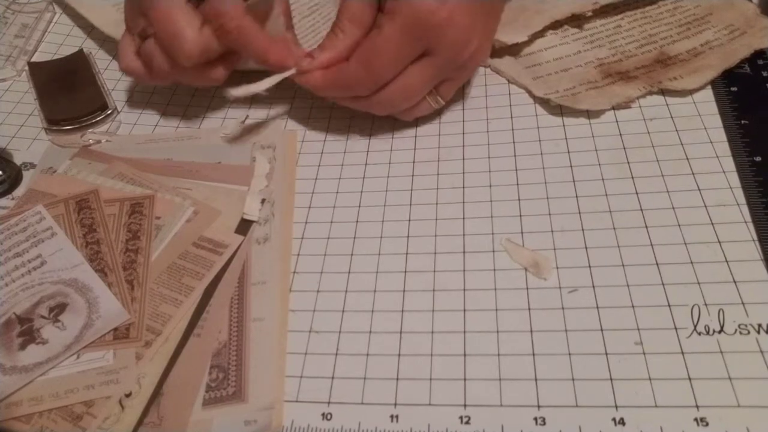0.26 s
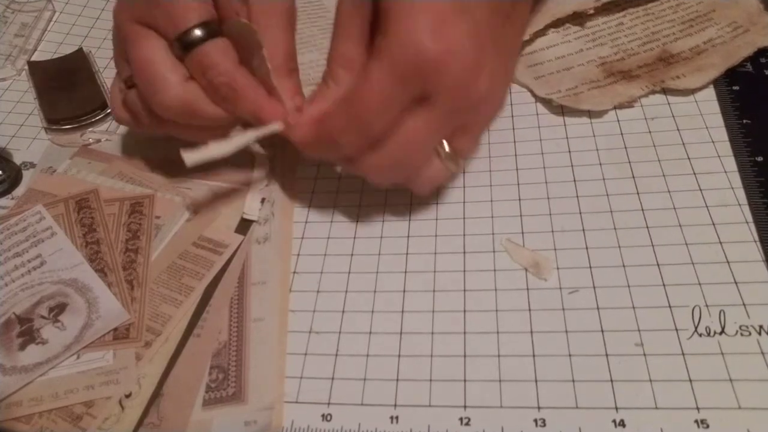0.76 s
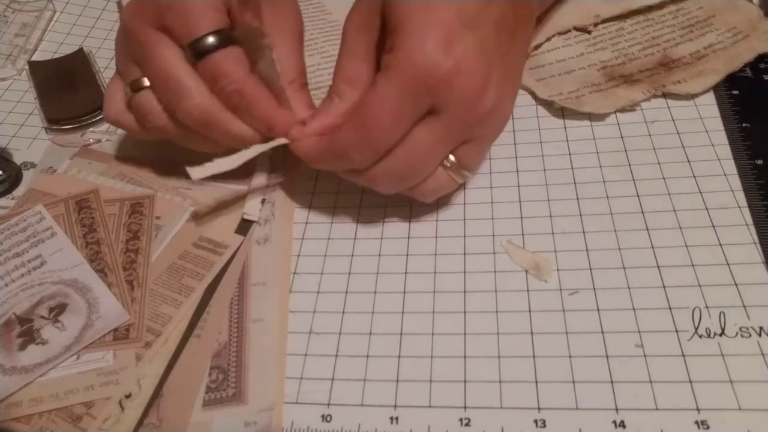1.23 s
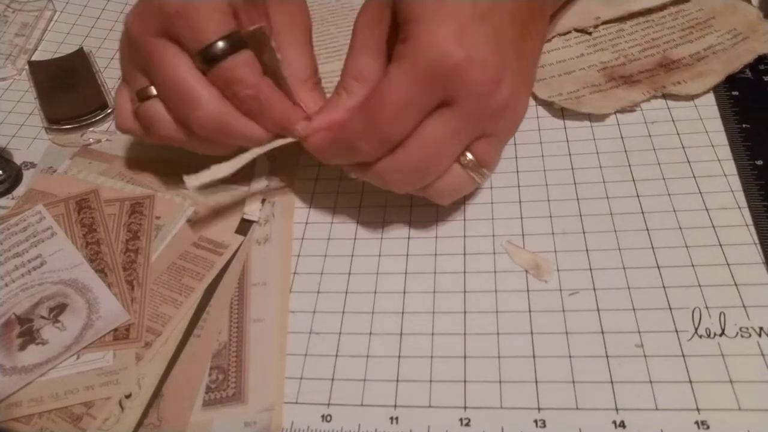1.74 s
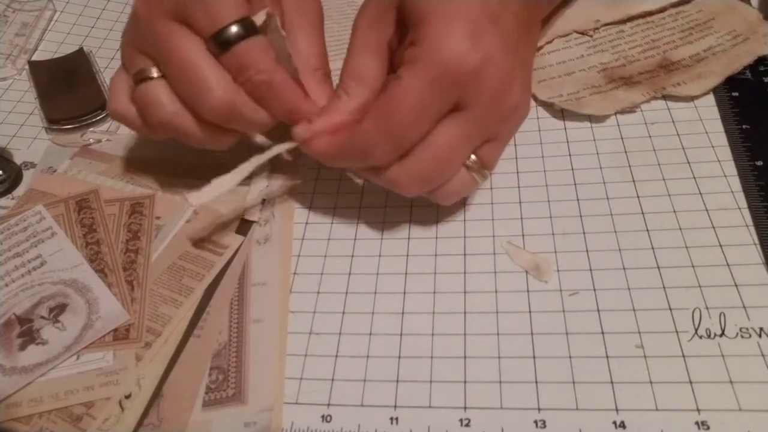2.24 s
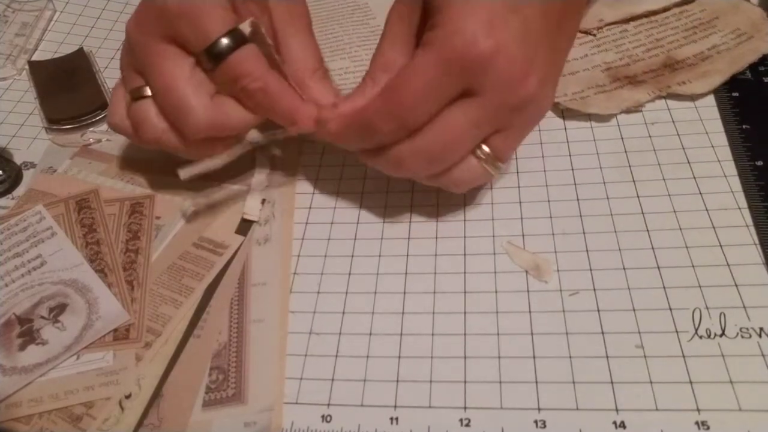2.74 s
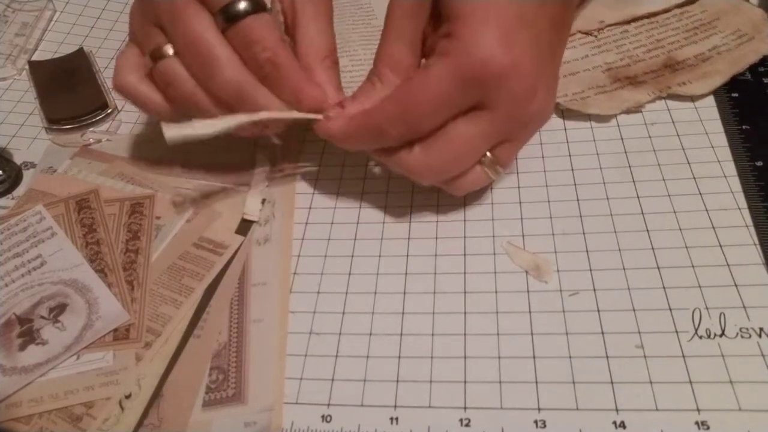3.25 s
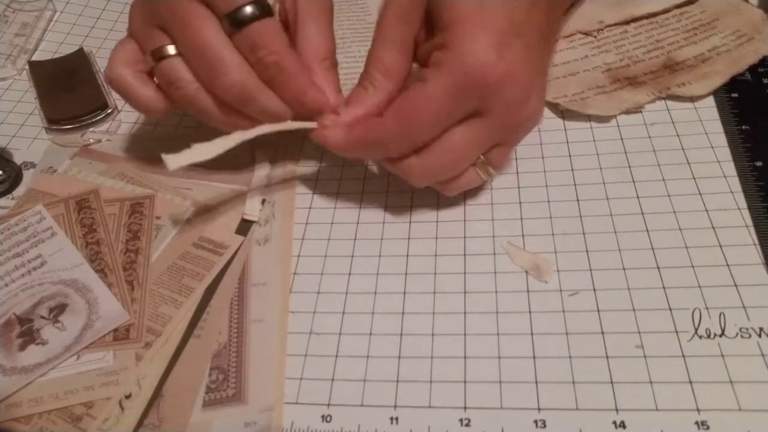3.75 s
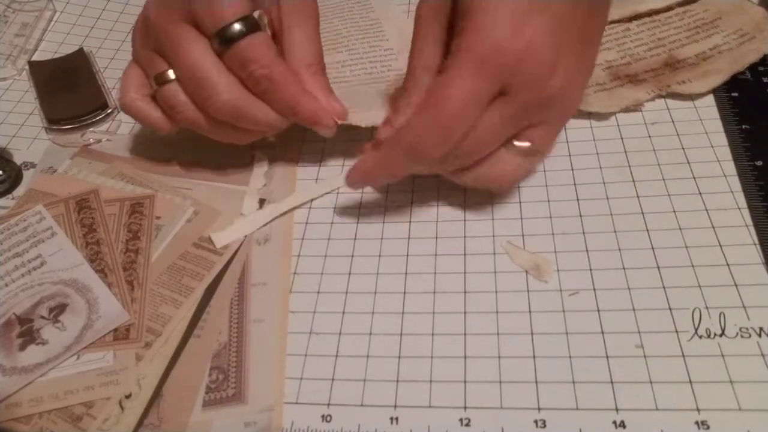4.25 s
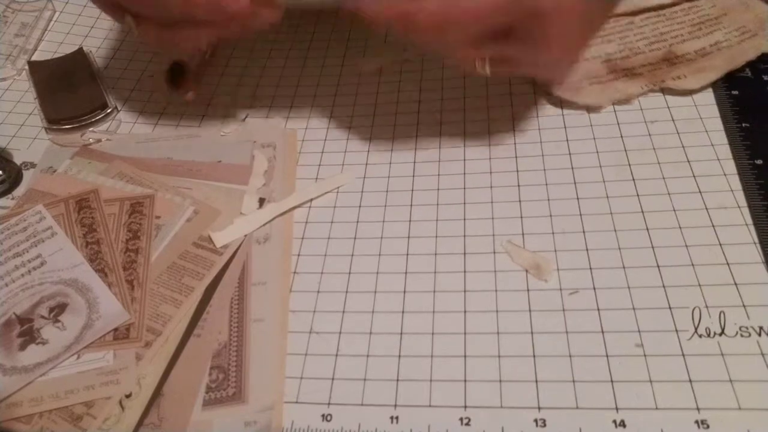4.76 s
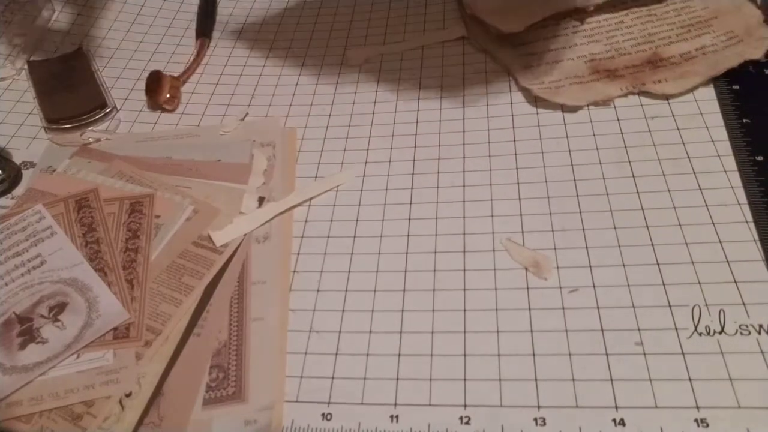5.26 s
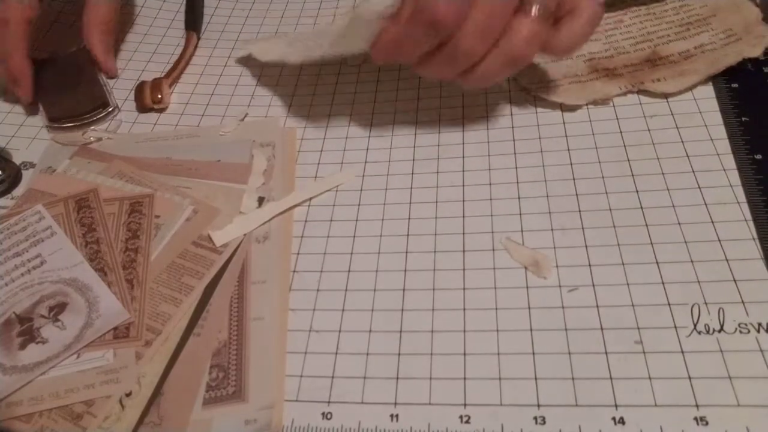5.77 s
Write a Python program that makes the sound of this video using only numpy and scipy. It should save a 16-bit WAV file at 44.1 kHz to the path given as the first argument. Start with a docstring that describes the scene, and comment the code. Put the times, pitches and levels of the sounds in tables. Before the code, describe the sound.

In a quiet room with low steady hum, paper is ripped by hand in brief, separate tugs, busiest in the first half second. Each tug is a grainy mid-pitched crackle with clicks and short rattles. Muffled low thumps of air buffet the close two-channel microphone, stronger at left. After the tearing, hollow little knocks cluster and thin dry rustling trails off.

```python
"""A quiet room hums throughout, made of half-octave bands of steady noise.
From the start, fingers tear a narrow strip off a sheet of paper in short pulls, close under a two-port
microphone: random fibre breaks ring the sheet's modes, creases snap as kicks with decaying rattles,
and the moving hands push low puffs of turbulent air at each port.
The fingers then turn the sheet: low knocks gather from about 4.7 s, drier rustle from about 5 s."""
import sys
import numpy as np
from scipy import signal
from scipy.io import wavfile
from scipy.ndimage import uniform_filter1d

SR = 44100
rng = np.random.default_rng(int(sys.argv[2]) if len(sys.argv) > 2 else 0)


def int16_out(signal):
    """Quantize to a 16-bit WAV file."""
    q = np.round(np.clip(np.atleast_2d(signal).T, -1, 1) * 32767)
    wavfile.write(sys.argv[1], SR, q.astype(np.int16))


N = 264600   # samples, 6 s

# upper modes of the small sheet: centre_hz, width_hz, level_db (relative)
SHEET_MODES = [(1530, 630, -2), (1787, 290, 6.5), (2004, 770, 0.5), (2800, 1330, -9.5)]
# broad resonances of the dry rasp: centre_hz, width_hz, level_db (relative)
RASP_MODES = [(3550, 1580, -3.5), (4980, 4020, -1), (6390, 4100, -3)]
# treble lift of the microphone: centre_hz, width_hz, level_db (relative)
TREBLE_MODES = [(9670, 3160, 7.5), (11220, 2380, 12.5), (15260, 5000, 5.5)]


def amp(db):
    """Level to amplitude: 20 dB is a factor of ten."""
    return 10 ** (np.asarray(db) / 20)


def rms_one(x):
    """Normalisation by mean power: scales each row to rms 1."""
    return x / np.sqrt(np.mean(x ** 2, axis=-1, keepdims=True) + 1e-20)


def at_hz(points, hz):
    """Interpolation on a logarithmic frequency axis."""
    points_hz, values = np.array(points).T
    return np.interp(np.log(hz), np.log(points_hz), values)


def drift(rate_hz):
    """Low-passed noise: white noise through a double real pole is a slow random drift of rms 1."""
    pole = np.exp(-2 * np.pi * rate_hz / SR)
    white = rng.standard_normal(N + SR)
    slow = signal.lfilter([1], [1, -2 * pole, pole * pole], white)
    return rms_one(slow[SR:])   # the first second lets the filter settle


def band(x, low_hz, high_hz):
    """Band limiting: keeps the skirts of a group of modes inside its own range."""
    return signal.sosfilt(signal.butter(2, [low_hz, high_hz], "band", fs=SR, output="sos"), x)


def resonate(x, modes, wander_db=None):
    """Modal superposition: parallel resonances, whose strengths may wander as the grip changes."""
    total = 0
    for k, (hz, width_hz, db) in enumerate(modes):
        r = np.exp(-np.pi * width_hz / SR)   # a wider resonance is damped faster
        numerator = [(1 - r * r) / 2, 0, (r * r - 1) / 2]
        denominator = [1, -2 * r * np.cos(2 * np.pi * hz / SR), r * r]
        rung = signal.lfilter(numerator, denominator, x)
        wander = wander_db * drift(5.06) if wander_db else 0
        sign = (-1) ** k
        total = total + sign * amp(db + wander) * rung
    return total


def panned(x, left_db):
    """Level difference between ports: left_db is left over right, with the gains' total power kept."""
    left = 1 / (1 + amp(-2 * left_db))
    shares = np.array([left, 1 - left]).reshape(2, -1)
    return x * np.sqrt(2 * shares)


def two_ports(x, alike):
    """Partial coherence: both ports hear row 0, the right one late, and each adds a row of its own."""
    right_lag = 4   # samples, the hands are nearer the left port
    alike = np.clip(alike, 0, 1)
    common = np.array([x[0], np.roll(x[0], right_lag)])
    return np.sqrt(alike) * common + np.sqrt(1 - alike) * x[1:]


def swells(rows, rise_s, resting_db):
    """Addition of powers: gains per layer from rows (start, hold, fall, levels) over a resting level."""
    t = np.arange(0, N + 32, 32) / SR   # one point every 32 samples
    power = amp(resting_db)[:, None] ** 2 + 0 * t
    for start_s, hold_s, fall_s, *levels_db in rows:
        before = np.maximum((start_s - t) / rise_s, 0)
        after = np.maximum((t - start_s - hold_s) / max(fall_s, .01), 0)
        drop_db = 20 * (before + after)   # rise_s and fall_s are the times for 20 dB
        power = power + amp(np.array(levels_db)[:, None] - drop_db) ** 2
    return np.array([np.interp(np.arange(N) / SR, t, row) for row in np.sqrt(power)])


def room():
    """Band-filtered stationary noise of room and microphone, with coherence set by mid and side powers."""
    # noise spectrum: centre_hz, density_db (per Hz, relative)
    spectrum = [(35, -52), (60, 1), (227, -2), (590, -37), (762, -26), (1400, -36.5), (1680, -32),
                (3240, -39), (6990, -43), (8620, -58), (10100, -57), (12200, -38), (15800, -27)]
    # left-right likeness: centre_hz, likeness (0 to 1)
    likeness = [(60, 0.29), (250, 1), (700, 0.28), (2000, 0.075), (5000, 0.023)]
    total, edges_hz = 0, 45 * 2 ** np.arange(0, 9, .5)
    white = rng.standard_normal((2, 2, N))
    for k, (low_hz, high_hz) in enumerate(zip(edges_hz, edges_hz[1:])):
        mid, side = band(white[k % 2], low_hz, high_hz)   # neighbouring bands use different noise
        centre_hz = np.sqrt(low_hz * high_hz)
        alike = np.clip(at_hz(likeness, centre_hz), 0, 1)
        ports = np.sqrt(1 + alike) * mid + np.sqrt(1 - alike) * side * [[1], [-1]]
        total = total + amp(at_hz(spectrum, centre_hz)) * ports
    return panned(amp(-58.5) * rms_one(total), 5.0)


def puffs():
    """Turbulent pressure: independent low noise at each port, its loudness evened out within a puff."""
    # air puffs from the moving hands: start_s (full strength), hold_s, level_db (mean power of the ports),
    # left_over_right_db
    puff_rows = [(0.0, 0.0024, -29.5, 14), (0.15, 0.062, -36, 19), (0.287, 0.0031, -32.5, 30),
                 (0.372, 0.0076, -42, 32), (0.44, 0.11, -51, 19), (0.761, 0.038, -40, 25),
                 (0.846, 0.043, -49.5, 29), (0.953, 0.0032, -38, 34), (1.039, 0.065, -42.5, 36),
                 (1.199, 0.0044, -44.5, -14), (1.3, 0.0076, -26, 18), (1.341, 0.063, -35, 5.5),
                 (1.477, 0.047, -49.5, -19), (1.639, 0.041, -28, 31), (1.789, 0.021, -39.5, -4),
                 (1.846, 0.063, -35.5, -3), (1.95, 0.082, -40, 3.5), (2.082, 0.0045, -32, 11),
                 (2.128, 0.0084, -29, 19), (2.182, 0.093, -44.5, 24), (2.397, 0.0057, -48.5, 30),
                 (2.48, 0.008, -43.5, 28), (2.734, 0.0062, -45, 27), (2.857, 0.005, -45.5, 32.5),
                 (2.97, 0.0026, -29, 30), (3.052, 0.005, -43, 3), (3.124, 0.044, -35.5, 27),
                 (3.254, 0.0017, -38.5, 15), (3.325, 0.0074, -40, 29), (3.517, 0.078, -47.5, 26),
                 (3.845, 0.0085, -44, 33), (4.053, 0.0062, -37.5, 40), (4.174, 0.085, -41, 45),
                 (4.371, 0.062, -39, 23.5), (4.484, 0.044, -43.5, 11), (4.608, 0.077, -34, 18),
                 (4.71, 0.018, -38.5, 4), (4.796, 0.048, -36, -1), (4.898, 0.013, -42, -0.5),
                 (5.003, 0.0032, -31.5, 18), (5.067, 0.005, -39, 11.5), (5.1, 0.0042, -34.5, -4),
                 (5.232, 0.024, -33, 19), (5.329, 0.02, -43, 8), (5.718, 0.0037, -45, 15),
                 (5.899, 0.0069, -49.5, 16)]
    # colour of the air noise: centre_hz, width_hz, level_db (relative)
    air_modes = [(37.8, 19.6, -5.5), (59.7, 24.9, 0.5), (99.3, 37.5, -4), (122.9, 76.6, -11)]
    # level between puffs: left_db, right_db
    still_air_db = [-55.5, -69.5]
    rise_s, fall_s = 0.038, 0.048   # times to climb and drop 20 dB
    rows = []
    for start_s, hold_s, db, left_db in puff_rows:
        port_powers = 2 / (1 + amp([-2 * left_db, 2 * left_db]))
        rows.append((start_s, hold_s, fall_s, *(db + 10 * np.log10(port_powers))))
    air = resonate(rng.standard_normal((2, N)), air_modes)
    air = band(air, 30.0, 170.0)
    local_rms = np.sqrt(uniform_filter1d(air ** 2, size=1800, axis=1) + 1e-12)
    evened = rms_one(air / local_rms ** 0.37)
    return swells(rows, rise_s, still_air_db) * evened


def faint_snaps(count):
    """Random point events: small snaps at uniformly drawn moments, each with its own colour."""
    mean_db = [-64.5, -64.5, -89, -67.5]   # body, knock, rasp, treble, before the layer gains
    spread_db, rattle_ms = 4.0, 5.1
    events = []
    for _ in range(count):
        start_s = N / SR * rng.random()
        levels_db = mean_db + spread_db * rng.standard_normal(len(mean_db))
        events.append((start_s, *levels_db, rattle_ms))
    return events


def snaps():
    """Impulse excitation: a snapping crease is a sharp kick and a dying rattle that ring all the modes."""
    # creases snapping: start_s, body_db, knock_db, rasp_db, treble_db (all before the layer gains below),
    # rattle_ms (amplitude decay constant before the decay factors)
    snap_rows = [(0.027, -40.5, -58, -63, -53, 9.5), (0.039, -37.5, -52.5, -49, -49, 10.7),
                 (0.083, -37.5, -53.5, -54, -53, 6.2), (0.165, -35.5, -58, -51.5, -44, 8.5),
                 (0.2674, -25, -40.5, -32.5, -38, 3), (0.2775, -42, -58, -47, -55, 2.6),
                 (0.488, -36.5, -37, -50, -42.5, 4.4), (0.736, -64, -61, -61, -52.5, 3),
                 (0.7816, -47.5, -61, -74, -49, 3.2), (0.8764, -46.5, -68, -79, -55, 2.6),
                 (0.907, -59, -61, -80, -58, 3.2), (0.966, -57, -82, -82, -60, 2.7),
                 (1.1428, -58, -69, -79, -76, 4), (1.267, -33, -64, -64, -43.5, 5.7),
                 (1.287, -40, -64, -70, -55, 3), (1.3196, -37.5, -49, -71, -65, 3.5),
                 (1.327, -40, -57, -70.5, -60, 2.5), (1.483, -55, -61, -62, -59, 4.1),
                 (1.6244, -36, -50, -53, -62, 2.4), (1.815, -61, -66, -69, -48.5, 3.9),
                 (1.8535, -52, -59, -73.5, -48, 3.9), (1.9053, -44, -75, -78, -48, 1.5),
                 (2.1048, -42, -42.5, -78, -71, 3.4), (2.1174, -58, -45.5, -78, -68, 3.7),
                 (2.1359, -45, -45, -72, -65, 3), (2.185, -49, -69, -70, -54, 3.3),
                 (2.3994, -72, -80, -85, -55, 3), (2.5934, -67, -77, -66, -49, 2.1),
                 (2.6943, -62.5, -40.5, -66.5, -71, 3.1), (2.7447, -52, -54, -80, -59, 4.2),
                 (3.0074, -35, -41, -59, -76, 2.5), (3.1648, -48, -62, -69, -45.5, 1.7),
                 (3.2151, -44, -67, -69, -49.5, 2.8), (3.3779, -44.5, -63, -72, -58, 3.1),
                 (3.5914, -43.5, -79, -66, -51, 8.6), (3.6262, -35, -51.5, -58.5, -50.5, 10),
                 (3.6726, -41, -55, -74, -71, 10), (3.7798, -68, -60, -95, -76, 4.6),
                 (4.408, -40, -54, -70, -64, 4.5), (4.4415, -37.5, -47, -71, -65, 2.4),
                 (4.7366, -41, -42, -56, -52, 12), (4.7572, -39.5, -41.5, -46.5, -48, 5.6),
                 (4.812, -36, -32, -48, -69, 3.2), (4.8252, -43, -41.5, -63, -68, 6.1),
                 (4.8434, -41, -40, -57, -70, 1.7), (4.8534, -45, -36.5, -59, -53, 7.7),
                 (4.9258, -48, -44.5, -73, -70, 6.7), (4.9838, -36, -32.5, -57, -47.5, 3.1),
                 (4.9955, -45, -44, -56, -65, 5.8), (5.0937, -33.5, -43.5, -69, -67, 3.6),
                 (5.1074, -54, -48.5, -47, -47, 4.1), (5.2205, -65, -53, -81, -73, 2.5),
                 (5.2504, -69, -70, -57, -54, 3.6), (5.3066, -48, -51, -69, -63, 7.1),
                 (5.325, -55, -50, -64, -52, 12), (5.5043, -70, -59, -72, -72, 3.9),
                 (5.5979, -46.5, -57, -50.5, -81, 3.7), (5.7073, -45, -56, -70, -66, 2.2)]
    # rattle decay factors: body, knock, rasp, treble (ratios)
    decay_factors = [1.03, 2.3, 1.2, 0.96]
    # height of the first kick relative to the snap's level: body, knock, rasp, treble (ratios)
    kick_heights = [1.52, 4.72, 3.9, 1.23]
    # sheet flexing as a whole: centre_hz, width_hz, level_db (relative)
    knock_modes = [(260, 210, -0.5), (499, 60, 4), (830, 355, -2.5)]
    length = 2600   # samples of rattle
    events = snap_rows + faint_snaps(count=18)
    rattles = rng.standard_normal((len(events), 3, length))
    kicks = np.zeros((4, 3, N + length))   # layer, path, time
    elapsed_ms = np.arange(length) / SR * 1000
    for (start_s, *levels_db, rattle_ms), rattle in zip(events, rattles):
        decay_ms = np.maximum(rattle_ms * np.array(decay_factors), .3)[:, None, None]
        shape = .3 * rattle * np.exp(-elapsed_ms / decay_ms)
        i = round(start_s * SR)
        kicks[:, :, i:i + length] += amp(levels_db)[:, None, None] * shape
        kicks[:, :, i] = -(amp(levels_db) * kick_heights)[:, None]   # same kick on all paths
    kicks = kicks[:, :, :N] + 1e-18   # keeps the filters off vanishingly small numbers

    body = band(resonate(kicks[0], SHEET_MODES), 530.0, 2130.0)
    body = amp(16.5) * two_ports(body, alike=0.97)
    push = amp(-18.0) * band(kicks[1], 150.0, 790.0)   # the pressure pulse itself, before the modes take over
    flexing = band(resonate(kicks[1], knock_modes), 160.0, 1470.0)
    knock = amp(18.0) * two_ports(push + flexing, alike=0.84)
    rasp = band(resonate(kicks[2], RASP_MODES), 2550.0, 5400.0)
    rasp = amp(20.0) * two_ports(rasp, alike=0.55)
    treble = band(resonate(kicks[3], TREBLE_MODES), 5200.0, 20000.0)
    treble = amp(5.5) * two_ports(treble, alike=0.1)
    return panned(body, 6.5) + panned(knock, 2.6) + panned(rasp, 2.0) + treble


def fibres(per_s, spread_db, clump_db):
    """Random impulse train: breaks come in clumps, a few much louder than the rest, over a fine rub."""
    clumps = amp(clump_db * drift(44.0))
    broken = rng.random(N) < per_s / SR
    sizes = amp(spread_db * np.minimum(rng.exponential(1, N), 3.5))
    breaks = broken * sizes * rng.standard_normal((3, N))
    rub = 0.46 * rng.standard_normal((3, N))
    return clumps * (breaks + rub)


def tearing():
    """Source and resonator: fibre crackle and sparser buckling of the sheet drive its modes pull by pull."""
    # pulls and rubs of the paper: start_s (full strength), hold_s, fall_s (for 20 dB, 0.01 at least),
    # body_db, belly_over_body_db (low modes), rasp_over_body_db, hiss_over_body_db
    pulls = [(0.0, 0.044, 0.21, -58.5, -8, -8, -7), (0.166, 0.0041, 0.15, -56.5, -3.5, -6.5, -3.5),
             (0.28, 0.0056, 0.08, -54, -6.5, -2, -4), (0.398, 0.082, -0.25, -78, 0, 9, 8.5),
             (0.473, 0.075, 0.13, -58, -5.5, -4, -3.5), (0.665, 0.004, 0.08, -61.5, 0.5, -7, -3),
             (0.722, 0.19, 0.1, -68, -0.5, -10, 0), (1.093, 0.0045, 0.18, -63, -3.5, -14, -2.5),
             (1.168, 0.0067, -0.15, -58.5, 2.5, -17, -10), (1.272, 0.037, 0.15, -57, 0, -9.5, -1.5),
             (1.478, 0.005, 0.16, -66, 1, -3, 3.5), (1.624, 0.0077, 0.04, -48, -2, -8.5, -4.5),
             (1.673, 0.005, 0.32, -64, -1.5, -5.5, -4.5), (1.815, 0.034, 0.22, -57.5, -10.5, -9, -2),
             (2.04, 0.009, 0.04, -58, -6.5, -11, 1), (2.101, 0.15, 0.17, -63, -7.5, -12, -4),
             (2.41, 0.04, 0.3, -81, -3, -14, 10.5), (2.526, 0.019, 0.09, -68.5, 0, -1.5, 3),
             (2.671, 0.011, 0.55, -67.5, -3, -24, -5.5), (2.753, 0.0038, 0.14, -60.5, 1.5, -12.5, -8),
             (3.017, 0.019, 0.16, -63.5, 6.5, -12, -10), (3.169, 0.09, -0.21, -62, -11, -16, -2.5),
             (3.389, 0.005, 0.0646, -52, -6, -13.5, -8), (3.465, 0.005, 0.18, -64.5, -8, -11, -1),
             (3.634, 0.0036, 0.1, -55.5, -2.5, -12.5, -8), (3.792, 0.026, 0.28, -61.5, -3, -12, -9),
             (4.013, 0.048, 2, -73.5, -7, -12.5, -8), (4.221, 0.005, 0.3, -63.5, -13, -4, -1),
             (4.42, 0.17, 0.23, -60.5, -8, 0, 1), (4.569, 0.013, 0.07, -54.5, -19, -4, 2),
             (4.732, 0.14, 0.24, -63, -0.5, 0, -0.5), (4.917, 0.087, 0.28, -65.5, 4, -1.5, 0),
             (5.04, 0.011, 0.16, -60.5, -12, 4, 3.5), (5.098, 0.039, 0.24, -68, -1.5, 5.5, 11),
             (5.25, 0.019, 0.38, -74, -6, 8, 9), (5.297, 0.07, 0.12, -66, -7, 4.5, 7.5),
             (5.593, 0.005, 0.4, -65.5, -5.5, -3, -5), (5.729, 0.0045, 0.16, -65, -8, 3.5, 6.5),
             (5.871, 0.14, 0.1, -66.5, -12.5, -3.5, -2)]
    # low modes of the held sheet: centre_hz, width_hz, level_db (relative)
    belly_modes = [(807, 300, 4), (1128, 145, 7), (463, 63, -2), (380, 91, 4.5)]
    # faint creak of the held sheet between pulls: body_db, belly_db, rasp_db, hiss_db
    held_db = [-119, -91.5, -84, -80]
    rows = []
    for start_s, hold_s, fall_s, body_db, *over_db in pulls:
        rows.append((start_s, hold_s, fall_s, body_db, *(body_db + np.array(over_db))))
    body_gain, belly_gain, rasp_gain, hiss_gain = swells(rows, 0.038, held_db)

    crackle = fibres(per_s=2500, spread_db=2.5, clump_db=1.5)
    buckling = fibres(per_s=500, spread_db=6.0, clump_db=2.5)
    body = band(resonate(crackle + 0.48 * buckling, SHEET_MODES, wander_db=1.5), 830.0, 2760.0)
    belly = band(resonate(buckling, belly_modes, wander_db=3.5), 270.0, 1500.0)
    rasp = band(resonate(crackle, RASP_MODES, wander_db=1.6), 2700.0, 7500.0)
    hiss = band(resonate(crackle[[1, 2, 0]], TREBLE_MODES, wander_db=1.2), 8000.0, 19000.0)

    body = body_gain * two_ports(rms_one(body), alike=0.7)
    belly = belly_gain * two_ports(rms_one(belly), alike=0.61)
    rasp = rasp_gain * two_ports(rms_one(rasp), alike=0.14)
    hiss = hiss_gain * two_ports(rms_one(hiss), alike=0.032)
    return panned(body, 7.5) + panned(belly, 0.78) + panned(rasp, 4.9) + hiss


def scene():
    """Superposition: the pressures of all sources add at the two ports."""
    return room() + puffs() + snaps() + tearing()


def record(dry):
    """Low-pass filtering: a steep Chebyshev filter cuts the top."""
    cutoff_hz = 16050   # edge of the 55 dB stop band
    return signal.sosfilt(signal.cheby2(20, 55, cutoff_hz, fs=SR, output="sos"), dry)


dry = scene()
out = record(dry)
int16_out(out)
```